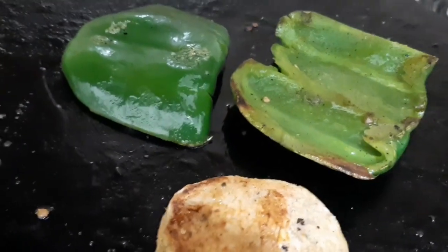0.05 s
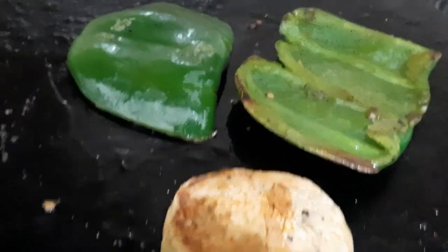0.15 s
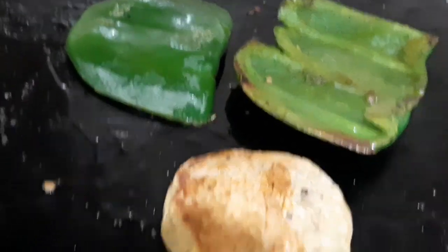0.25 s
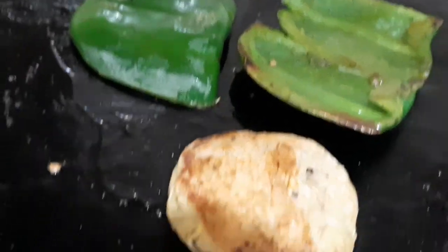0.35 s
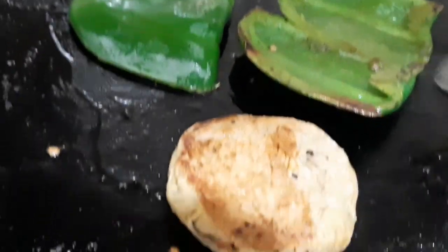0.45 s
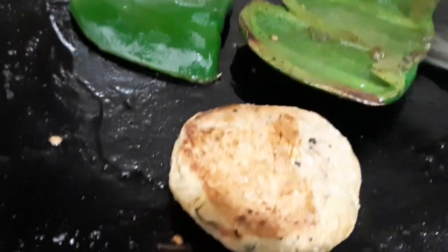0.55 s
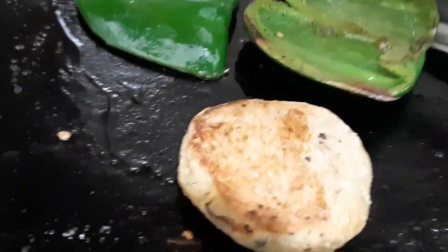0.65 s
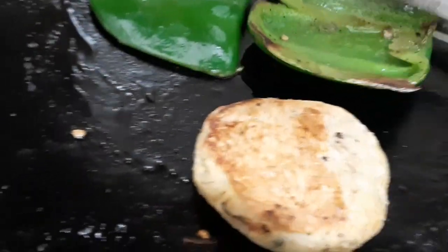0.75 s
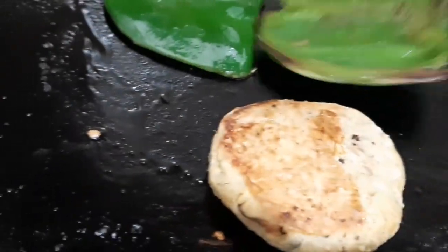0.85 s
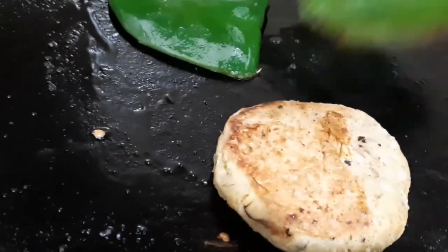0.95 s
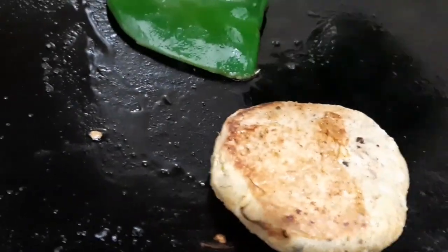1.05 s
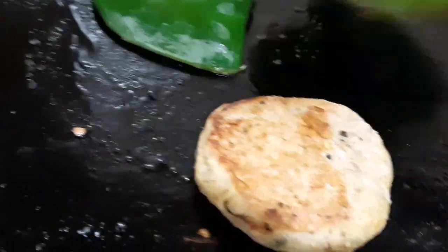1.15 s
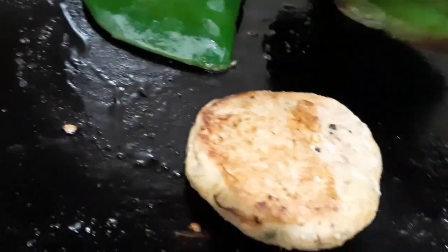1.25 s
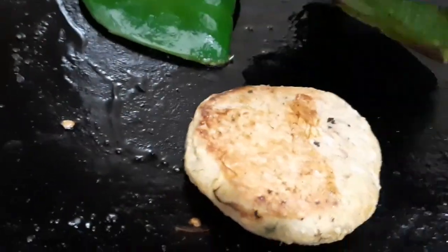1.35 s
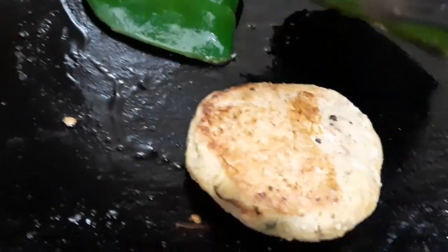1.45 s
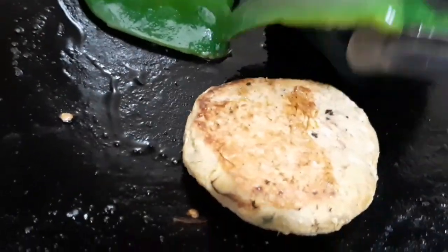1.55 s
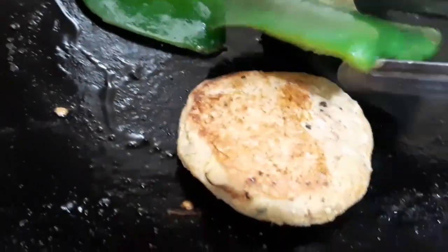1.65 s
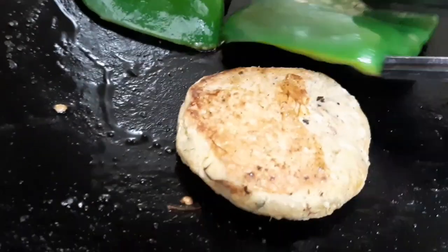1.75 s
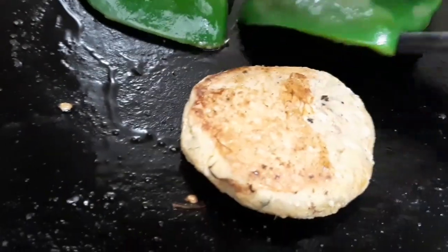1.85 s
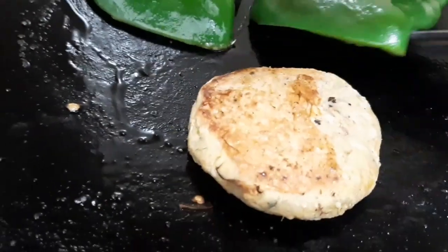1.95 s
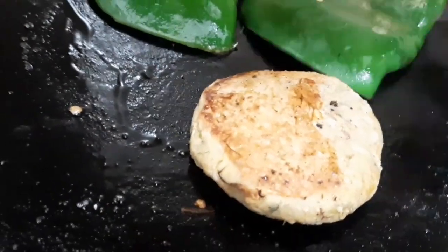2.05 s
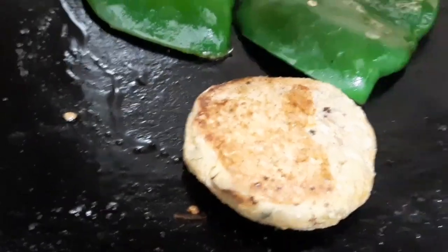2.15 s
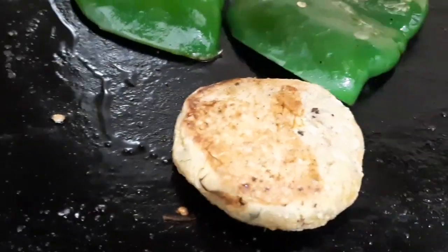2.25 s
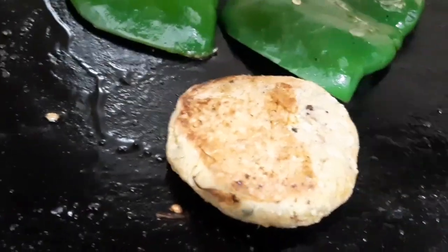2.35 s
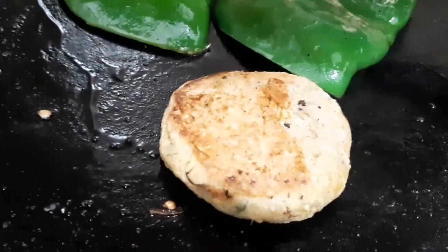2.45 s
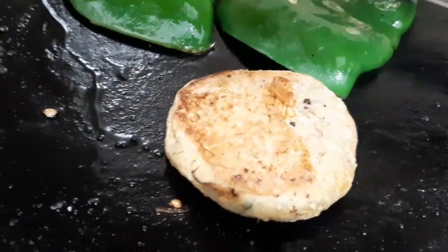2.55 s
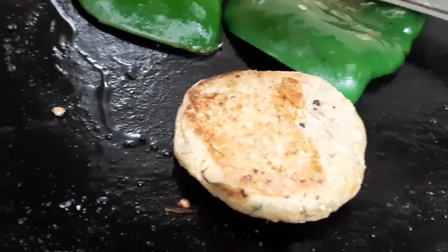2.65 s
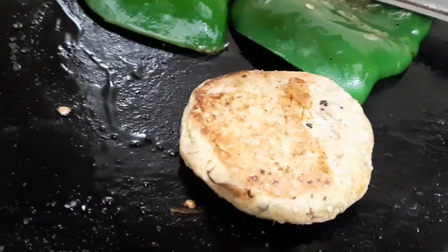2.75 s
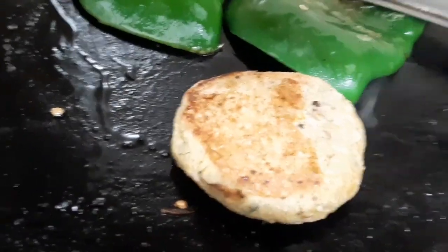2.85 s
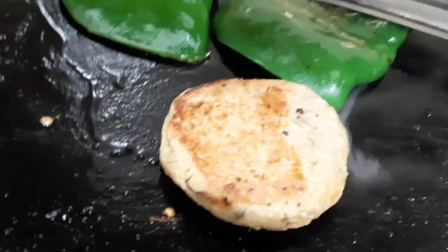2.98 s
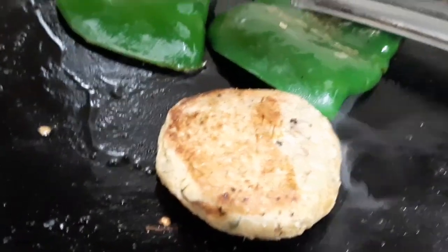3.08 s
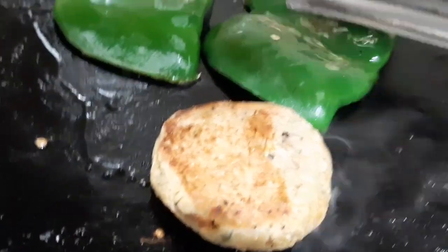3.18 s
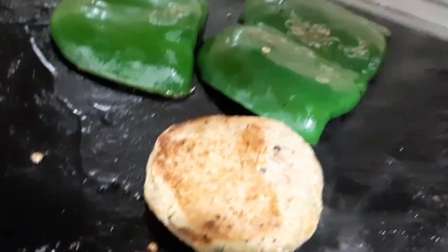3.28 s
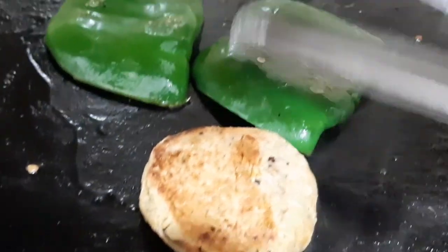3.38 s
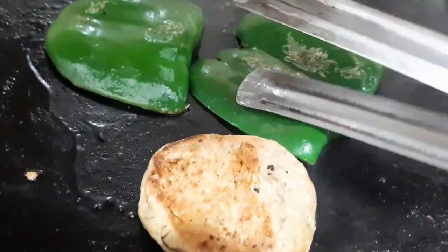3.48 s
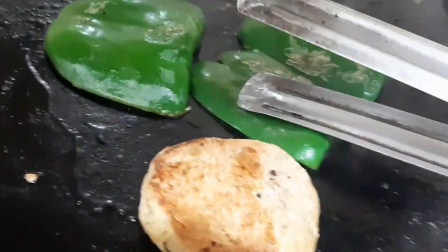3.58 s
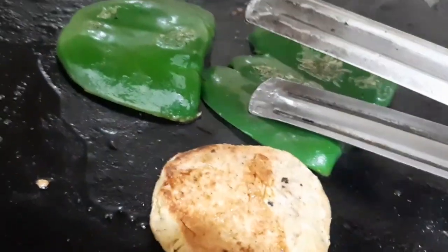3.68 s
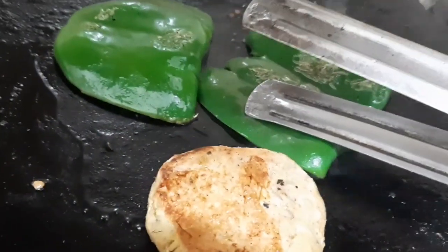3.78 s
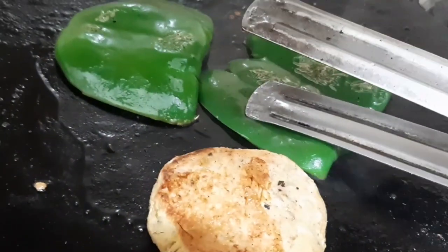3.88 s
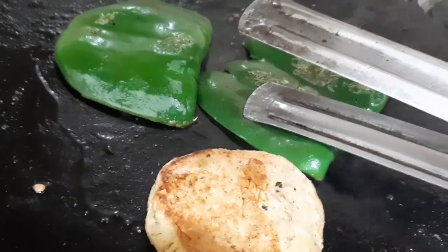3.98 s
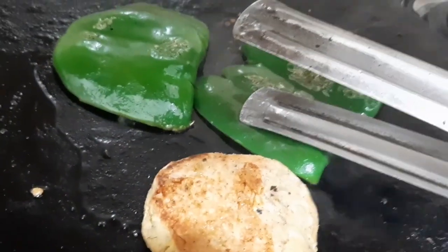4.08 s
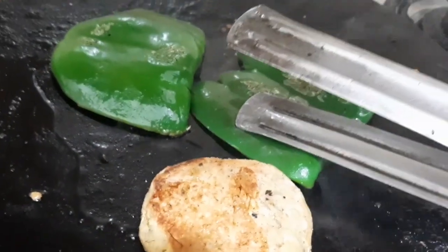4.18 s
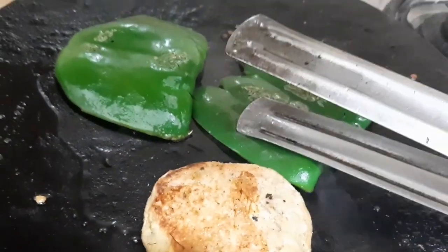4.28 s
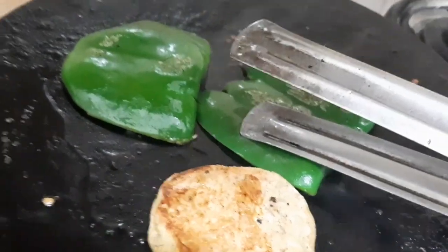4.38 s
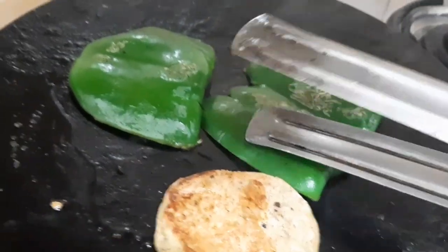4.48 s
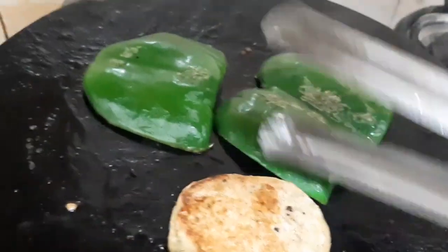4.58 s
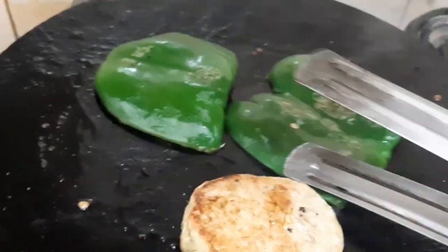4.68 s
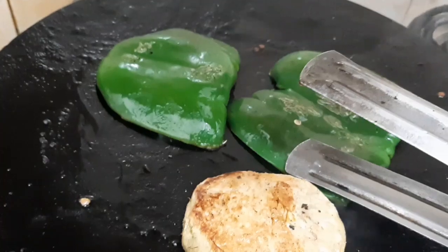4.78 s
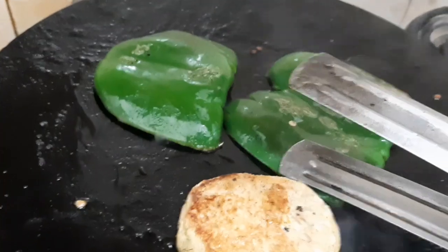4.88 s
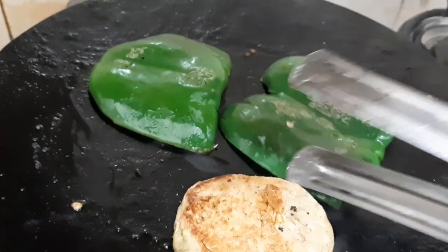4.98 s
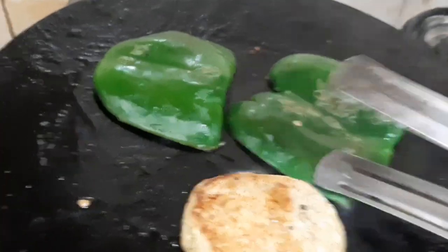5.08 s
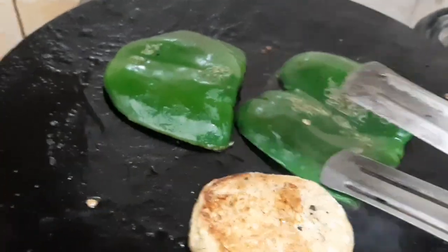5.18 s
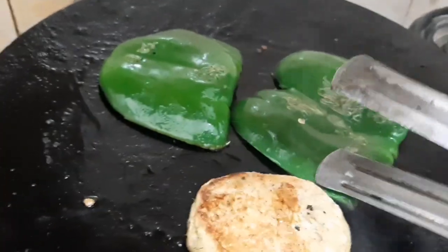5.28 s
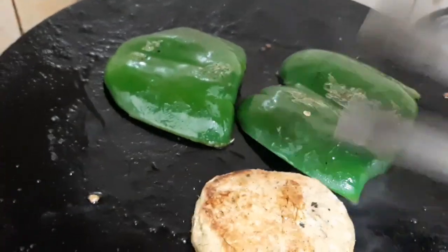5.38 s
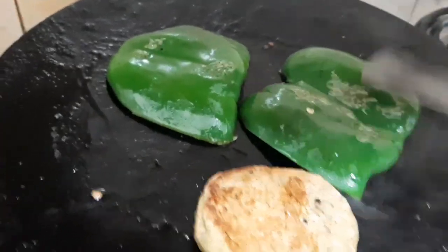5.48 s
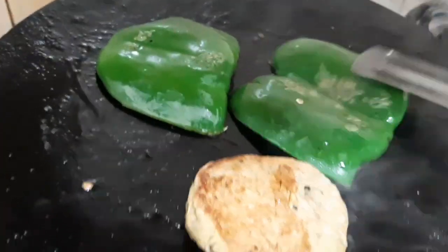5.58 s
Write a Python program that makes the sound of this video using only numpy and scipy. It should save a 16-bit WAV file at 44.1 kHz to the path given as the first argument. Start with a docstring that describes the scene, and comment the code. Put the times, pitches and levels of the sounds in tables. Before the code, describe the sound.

Oil sizzles on an iron griddle as steel tongs knock and scrape, then a pressed pepper flares into loud sizzling, steam and pops.

```python
"""Peppers on the griddle

Peppers and a patty fry in oil on an iron griddle, up close in a small kitchen; tiny bursting
bubbles make the sizzle. Steel tongs knock and scrape the iron, and food bumps the heavy plate.
A pepper is turned and pressed down: its wet side flares into a loud sizzle, steam rushes
out from under it and drops of oil spit."""
import sys
import numpy as np
from scipy import signal
from scipy.fft import rfft, irfft
from scipy.io import wavfile
from scipy.ndimage import uniform_filter1d

SR = 44100
rng = np.random.default_rng(int(sys.argv[2]) if len(sys.argv) > 2 else 0)


def persist_wave(psi):
    """Save psi, clipped to +-1, as 16-bit WAV."""
    counts = np.round(np.clip(psi, -1, 1) * 32767).astype(np.int16)
    wavfile.write(sys.argv[1], SR, np.atleast_2d(counts).T)


N = 248283
TIME = np.arange(N) / SR

# Levels in the tables are relative: each layer sets its own gain.
RUMBLE_EQ = [(15, -52), (25, -31), (54, -8.5), (72, -3), (86, -9), (113, -1.5), (179, -0.5), (205, 1),
             (243, -0.5), (334, -7), (374, -3), (412, -13), (442, -17), (487, -11), (700, -5.5),
             (910, -14.5), (1540, -120)]  # low room tone: f/Hz, level/dB
DRONE_BANDS = [(94, 20.6, -67), (138.5, 9.6, -68.5), (176.2, 12, -66.5), (244.3, 9.4, -70), (446, 24, -73)]  # kitchen drone: f/Hz, width/Hz, level/dB
SIMMER_EQ = [(240, -63), (400, -34), (439, -21), (579, -49), (685, -17), (740, -17.5), (1090, -8),
             (1550, -3.5), (2530, -15.5), (4410, -1.5), (5300, -6.5), (7100, -2), (8670, -10), (13500, -1),
             (15800, 0)]  # oil simmering all over the plate: f/Hz, level/dB
STIRS = [(0.146, 0.16, -37), (0.517, 0.26, -40.5), (1.016, 0.35, -45.5), (1.76, 0.26, -45.5)]  # tongs push food through fresh oil: t/s, length/s, level/dB
# oil spits and, at 0.167 s, the tongs' first light tick on the iron, just before their knock:
# t/s, snap/dB, body/dB, left-right/dB
SPITS_AND_TICK = [(0.0577, -24, -27, -8), (0.167, -12, -18, -3), (0.235, -14.5, -27, 3),
                  (0.6058, -14, -15, 0), (.6854, -14, -22, 9), (0.7434, -15, -29, -7),
                  (0.8477, -2, -3.5, -1.5), (1.3213, -18, -20, 0.5), (1.4202, -9.5, -11, -3),
                  (1.4666, -15.5, -21, -7), (1.6883, -11.5, -17, 2), (5.0761, -9, -24, -6)]
POPS = [(3.5861, -3.5, -23, 1), (3.775, -4, -18, -1), (3.8437, -7.5, -23, -1), (3.9829, -6, -23, -8),
        (4.0045, -5, -20, 6), (4.2889, -6.5, -21, -1), (4.3424, -11.5, -23, 6), (4.6494, -12, -21, -4)]  # steam pockets under the pressed pepper: t/s, body/dB, snap/dB, left-right/dB
SNAP_EQ = [(100, -72), (500, -48), (2300, -6), (3900, -1.5), (5500, -2.5), (7300, 2), (9000, -3.5),
           (12000, 2), (15500, 3.5)]  # bright attack of a spit, tick or pop: f/Hz, level/dB
BODY_EQ = [(40, -24), (200, -20.5), (450, -26), (850, -2), (1500, 2.5), (2600, 3), (3900, 9.5), (5300, -14),
           (10000, -13), (16000, -50)]  # body of a spit, tick or pop: f/Hz, level/dB
POCKET_MODES = [(1090, 310, -8), (1880, 190, 3.5), (3980, 370, -14)]  # the hollow under the pepper: f/Hz, width/Hz, level/dB
TONG_MODES = [(1123, 0, .17), (1235, -10, .18), (1281, -4, .3), (1355, -7, .18), (1560, 0, .11),
              (1830, -9, .1), (2051, -7, .16), (2299, -4, .14), (2590, -18, .2), (2810, -15, .15),
              (2929, -13, .4), (3280, -16, .15), (3650, -13, .12), (4220, -18, .17), (4888, -16, .18)]  # the two steel arms: f/Hz, level/dB, t60/s at damping 1
# tongs striking iron: t/s, level/dB, upper modes/dB, clatter/dB, grip damping/factor
KNOCKS = [(0.1702, -19.5, -23, -3.5, 1.07), (0.3153, -42.5, -12, 6.5, 1.8), (.358, -37, -29, -5, 0.88),
          (0.3966, -30.5, -8.5, -11, 2), (1.8226, -29.5, 3, 3, 1), (1.931, -39, -7, -17, 0.76)]
CLATTER_EQ = [(60, -53), (300, -4.5), (700, -5), (1100, 12.5), (2300, -4.5), (3300, 5.5), (5000, -5),
              (7000, -8), (12000, -27)]  # steel clattering on iron: f/Hz, level/dB
SCRAPES = [(0.356, 0.055, 0.13, -45.5), (0.505, 0.036, 0.12, -36)]  # the tips shove under the pepper: t/s, rise/s, length/s, level/dB
SQUEALS = [(0.376, .025, .03, -43), (0.548, .05, 0.083, -36.5), (0.692, .1, .11, -38.5)]  # the tips catch: t/s, rise/s, length/s, level/dB
SCRAPE_EQ = [(400, -13), (900, -33), (1130, 2), (1330, -0.5), (1560, -12), (2050, 0), (2350, -15),
             (2800, 3), (3000, -7), (3700, 0), (8000, -12)]  # steel chattering over iron: f/Hz, level/dB
BUMPS = [(0.399, -35.5, 0.65), (.55, -47, 0.86), (1.29, -46, 0.42), (2.09, -46.5, 0.49),
         (3.509, -40.5, 0.5), (5.168, -47, 0.39)]  # food bumping the plate: t/s, level/dB, t60/s
PLATE_MODES = [(187, 34, 0.5), (252, 16, 5), (322, 280, -16), (490, 8.3, -28)]  # boom of the iron plate: f/Hz, width/Hz, level/dB
TOUCHES = [(1.946, 0.032, -44), (2.08, .05, -38), (2.23, 0.12, -41.5), (2.503, 0.1, -38)]  # the turned pepper settles on its wet side: t/s, length/s, fizz/dB
# the tongs press the pepper and steam escapes through a gap at its rim: t/s, rise/s, length/s,
# fizz/dB, boil/dB, gap f/Hz, gap width/Hz, gap/dB, hollow/dB, hiss/dB, left-right/dB
PRESSES = [(2.607, 0.074, 0.41, -28, -39, 2500, 496, -40.5, -41.5, -56, 0.5),
           (2.996, .12, .16, -36.5, -43.5, 2425, 796, -37.5, -44, -58, 0.5),
           (3.21, 0.074, 0.19, -38, -43, 4500, 1100, -40.5, -44, -64, -5),
           (3.461, .07, 0.58, -33, -41.5, 3580, 700, -38.5, -52, -54, -5),
           (3.547, 0.13, 0.97, -34, -45, 3230, 930, -38, -47.5, -60, -4),
           (4.678, 0.12, 0.22, -36, -43.5, 3900, 990, -37, -54.5, -45.5, -14),
           (5.085, 0.16, 0.27, -33, -39, 3730, 1610, -40, -66, -43, -4)]
FIZZ_EQ = [(3000, -44), (7000, -29), (9000, -10.5), (10500, -4), (13000, 0), (15500, 0.5)]  # fine bubbles on the wet side: f/Hz, level/dB
BOIL_EQ = [(60, -85), (300, -33), (550, -26.5), (800, -7), (1050, -2), (1450, -2.5), (1900, -2.5),
           (2400, 2), (3200, 3), (4350, 7.5), (5400, 2.5), (6400, 3), (7400, 7.5), (8800, -2.5),
           (12000, -24)]  # coarser bubbling: f/Hz, level/dB
HOLLOW_MODES = [(1212, 516, -0.5), (1934, 370, 2)]  # steam inside the pepper: f/Hz, width/Hz, level/dB
WHISTLES = [(5.145, .18, 4780, 45, -46.5, -9)]  # steam in a pinhole: t/s, length/s, f/Hz, width/Hz, level/dB, left-right/dB
ROOM_DECAY = [(200, 0.4), (1000, 0.27), (4000, 0.32), (15000, 0.12)]  # kitchen reverb: f/Hz, t60/s
PORT_BALANCE = [(60, -2), (400, -2), (800, 2), (1350, 4.5), (1900, 2), (2600, 3.5), (4000, -1.5),
                (7000, -1.5), (9000, 2), (11500, -1), (15000, 5)]  # stereo colour of the microphone ports: f/Hz, left-right/dB

TOUCH_RISE_S, TOUCH_FALL_DB_PER_S = 0.023, 200
PRESS_SAG_DB_PER_S = 9  # the water under the pepper runs out


def amp(db):
    """Decibels to gain."""
    return 10 ** (np.asarray(db) / 20)


def unit(x):
    """Scales a stereo pair so that its mono mix has rms 1."""
    return x / np.sqrt(np.mean(x.mean(0) ** 2) + 1e-20)


def read(points, hz):
    """Reads a curve on a logarithmic frequency axis."""
    f, value = np.transpose(points)
    return np.interp(np.log(hz + 1), np.log(f), value)


def pan(db):
    """Left and right gains for a level difference."""
    return amp(np.array([[db], [-db]]) / 2)


def add(mix, s, sound):
    """Mixes a sound in at time s."""
    part = mix[:, round(s * SR):][:, :sound.shape[1]]
    part += sound[:, :part.shape[1]]


def eq(x, points, size=8192):
    """Minimum-phase EQ, so that clicks keep a sharp attack."""
    hz = abs(np.fft.fftfreq(size, 1 / SR))
    log_gain = np.log(amp(read(points, hz)))
    response = np.exp(np.conj(signal.hilbert(log_gain)))
    taps = np.fft.ifft(response).real[:size // 2]
    return signal.oaconvolve(x, taps[None], axes=1)[:, :x.shape[1]]


def resonate(x, hz, width):
    """A resonance with a peak gain near 1."""
    r = np.exp(-np.pi * width / SR)
    return 2 * signal.lfilter([1 - r], [1, -r * np.exp(2j * np.pi * hz / SR)], x).real


def noise(spread, size=N):
    """Centred noise plus a separate share on each side."""
    z = rng.standard_normal((3, size))
    return z[0] + spread * z[1:]


def swell(start, rise, length, fall_db_per_s, sag_db_per_s=0):
    """An envelope that rises, holds with a sag until its length is over, then dies away."""
    t = TIME - start
    sag_db = sag_db_per_s * np.maximum(t - rise, 0)
    fall_db = fall_db_per_s * np.maximum(t - length, 0)
    return np.clip(t / rise, 0, 1) * amp(-sag_db - fall_db)


def power_sum(gains):
    """Unrelated sounds add in power."""
    return np.sqrt(sum(gain ** 2 for gain in gains))


def sputter(depth_db, fastest_hz, count=24):
    """A factor that wavers around 1 in slow and fast random surges."""
    hz = np.geomspace(fastest_hz / 10, fastest_hz, count)[:, None]
    t = TIME[::64]
    wave = np.sin(2 * np.pi * (hz * t + rng.random((count, 1)))).sum(0)
    return amp(depth_db * np.interp(TIME, t, wave / wave.std()))


def kitchen():
    """Room tone: a low rumble with a few droning resonances."""
    air = noise(0.37)
    drone = sum(amp(db) * unit(resonate(resonate(air, hz, width), hz, width))
                for hz, width, db in DRONE_BANDS)
    return amp(-63.5) * unit(eq(noise(1.0), RUMBLE_EQ)) + drone


def bubbles(per_s, spread_db, top_db):
    """Clicks of bursting bubbles, mostly tiny; each has its own delay and level between the sides."""
    size_db = np.minimum(spread_db * rng.exponential(1, N), top_db)
    clicks = amp(size_db) * rng.choice([-1, 1], N) * (rng.random(N) < per_s / SR)
    side = amp(3 * rng.standard_normal(N))
    right_arrival = (np.arange(N) + rng.integers(-5, 6, N)) % N
    return np.array([clicks * side, np.bincount(right_arrival, clicks / side, N)])


def simmer(drying_db_per_s=0.91):
    """Tiny oil bubbles and sparse pitched crackles swell with each stir and slowly die down."""
    bed = unit(eq(bubbles(9000, 2.1, 17.2), SIMMER_EQ)) * sputter(1.0, 40)
    crackle = sum(resonate(bubbles(27, 7.8, 9.8), hz, width=4300) * hz
                  for hz in np.linspace(5000, 15500, 12))
    crackle = unit(eq(crackle, SIMMER_EQ)) * sputter(0.72, 55)
    stirs = [amp(db) * swell(s, 0.043, length, fall_db_per_s=98) for s, length, db in STIRS]
    gain = power_sum([amp(-40 - drying_db_per_s * TIME), *stirs])
    return gain * (amp(1.0) * bed + amp(-6.5) * crackle)


def transient(decay_s, tail_db, tail_s, size=4096):
    """A sharp click, a brief noise burst and the scatter off plate and food; energy 1 a side."""
    t = np.arange(size) / SR
    envelope = np.exp(-t / decay_s) + amp(tail_db) * np.exp(-t / tail_s)
    burst = rng.standard_normal((2, size)) * envelope
    burst[:, 0] = 4  # the click
    return burst / np.linalg.norm(burst, axis=1, keepdims=True)


def small_spits(per_s=11):
    """Lesser drops burst at random all over the plate; columns as in SPITS_AND_TICK."""
    when, size, side = rng.random((round(per_s * N / SR), 3)).T
    snap_db = -19.5 + 0.5 * np.log(np.maximum(size, 0.1))
    return list(zip(when * TIME[-1], snap_db, snap_db - 9, 8 * (2 * side - 1)))


def small_pops(start_s=3.22, end_s=4.1, per_s=28):
    """Lesser steam pockets pop at random under the pressed pepper; columns as in POPS."""
    when, size, side = rng.uniform(-1, 1, (round(per_s * (end_s - start_s)), 3)).T
    body_db = -15 + 4 * size
    return list(zip(np.interp(when, [-1, 1], [start_s, end_s]), body_db, body_db - 15, 6 * side))


def spits_tick_and_pops():
    """Oil spits, the tongs tick once and steam pops, each a snap and a body; pops ring the hollow."""
    snaps, in_open, trapped = np.zeros((3, 2, N))

    def hit(bodies, s, snap_db, body_db, side_db):
        add(snaps, s, amp(snap_db) * pan(side_db) * transient(0.0009, tail_db=-15, tail_s=0.007))
        add(bodies, s, amp(body_db) * pan(side_db / 2) * transient(0.0002, tail_db=-17, tail_s=0.009))

    for s, snap_db, body_db, side_db in SPITS_AND_TICK + small_spits():
        hit(in_open, s, snap_db, body_db, side_db)
    for s, body_db, snap_db, side_db in POPS + small_pops():
        hit(trapped, s, snap_db, body_db, side_db)
    inside = eq(trapped, BODY_EQ)
    body = eq(in_open, BODY_EQ) + inside
    hollow = sum(amp(db) * resonate(inside, hz, width) for hz, width, db in POCKET_MODES)
    return amp(8) * eq(snaps, SNAP_EQ) + amp(2.5) * body + amp(5.5) * hollow


def tong_ring(upper_db, damping):
    """The steel arms ring after one blow; upper_db trims every mode above the lowest."""
    t = np.arange(SR // 2) / SR
    phases = rng.uniform(-0.9, 0.9, (len(TONG_MODES), 2, 1))
    ring = np.zeros((2, len(t)))
    for k, (hz, db, t60) in enumerate(TONG_MODES):
        envelope = amp(db + upper_db * (k > 0) - 60 * damping * t / t60)
        ring += (-1) ** k * envelope * np.sin(2 * np.pi * hz * t + phases[k])
    return ring * (1 - np.exp(-t / 0.00027))  # the blow takes a moment to spread along the arms


def tong_knocks():
    """Steel meets iron: a short clatter and the ring of the tongs."""
    out = np.zeros((2, N))
    t = np.arange(SR // 2) / SR
    for s, db, upper_db, clatter_db, damping in KNOCKS:
        clatter = eq(noise(1.0, len(t)) * np.exp(-damping * t / 0.012), CLATTER_EQ)
        add(out, s, amp(db) * (tong_ring(upper_db, damping) + amp(clatter_db) * clatter))
    return out


def tong_scrapes(slips_per_s=130, squeal_hz=1126):
    """The tips stick and slip in uneven jerks, then lock onto the lowest mode and squeal."""
    chatter_gain = power_sum(amp(db) * swell(s, rise, length, fall_db_per_s=109)
                             for s, rise, length, db in SCRAPES)
    squeal_gain = power_sum(amp(db) * swell(s, rise, length, fall_db_per_s=330)
                            for s, rise, length, db in SQUEALS)
    slip_count = np.floor(np.cumsum(slips_per_s * sputter(5, 150)) / SR)
    slips = np.diff(slip_count, prepend=0) * sputter(2.6, 120)
    ringing = signal.oaconvolve(slips[None], tong_ring(upper_db=0, damping=4), axes=1)[:, :N]
    chatter = unit(eq(ringing, SCRAPE_EQ))
    phase = 2 * np.pi * np.cumsum(squeal_hz * sputter(0.03, 77.8)) / SR
    squeal = np.sqrt(2) * np.sin(phase) * sputter(0.83, 84)
    return chatter_gain * chatter + squeal_gain * squeal


def plate_bumps():
    """Soft blows of food set the heavy plate booming for a moment."""
    envelope = sum(amp(db - 60 * np.maximum(TIME - s, 0) / t60) * (TIME > s) for s, db, t60 in BUMPS)
    drive = noise(0.13)
    boom = sum(amp(db) * resonate(resonate(drive, hz, 2 * width), hz, 2 * width)
               for hz, width, db in PLATE_MODES)
    return amp(-7) * unit(boom) * uniform_filter1d(envelope, 300)  # smoothing softens the attack


def pepper_sizzle(lies_flat_s=3, fizz_fall_db_per_s=28, boil_fall_db_per_s=51):
    """The pepper's wet side boils: fine fizz over coarser bubbling, flaring at each touch and press."""
    touches = power_sum(amp(db) * swell(s, TOUCH_RISE_S, length, TOUCH_FALL_DB_PER_S)
                        for s, length, db in TOUCHES)
    resting = np.clip((TIME - lies_flat_s) / TOUCH_RISE_S, 0, 1)
    fizz_gains = [touches, amp(-40) * resting]
    boil_gains = [amp(-15.5) * touches, amp(-48.5) * resting]
    for s, rise, length, fizz_db, boil_db, *_ in PRESSES:
        fizz_gains.append(amp(fizz_db) * swell(s, rise, length, fizz_fall_db_per_s, PRESS_SAG_DB_PER_S))
        boil_gains.append(amp(boil_db) * swell(s, rise, length, boil_fall_db_per_s, PRESS_SAG_DB_PER_S))
    fizz = unit(eq(bubbles(14000, 3.6, 11.7), FIZZ_EQ)) * sputter(0.82, 50)
    boil = unit(eq(bubbles(9000, 2.9, 8.1), BOIL_EQ)) * sputter(0.9, 50)
    return amp(0.5) * power_sum(fizz_gains) * fizz + amp(4.5) * power_sum(boil_gains) * boil


def steam(hz, width):
    """Bubbling steam through a steep resonance whose pitch may glide."""
    carrier = np.exp(2j * np.pi * np.cumsum(hz * np.ones(N)) / SR)
    r = np.exp(-np.pi * width / SR)
    baseband = signal.lfilter([1], np.poly([r, r]), bubbles(4000, 2.84, 16.0) / carrier)
    return unit((carrier * baseband).real)


def steam_jets(sink_octaves_per_s=0.053, fall_db_per_s=88):
    """Steam sounds the pepper's hollow, hisses out of a new gap at each press and whistles a pinhole."""
    out = np.zeros((2, N))
    hollow = unit(sum(amp(db) * steam(hz, width) for hz, width, db in HOLLOW_MODES))
    hiss = steam(hz=6160, width=2900)
    for s, rise, length, _, _, hz, width, gap_db, hollow_db, hiss_db, side_db in PRESSES:
        gap_hz = hz * 2 ** (-sink_octaves_per_s * np.maximum(TIME - s, 0))  # the pepper softens
        gap = amp(gap_db) * unit(pan(side_db) * steam(gap_hz, width))
        around = pan(side_db / 2) * (amp(hollow_db) * hollow + amp(hiss_db) * hiss)
        out += (gap + around) * swell(s, rise, length, fall_db_per_s, PRESS_SAG_DB_PER_S)
    for s, length, hz, width, db, side_db in WHISTLES:
        whistle = unit(pan(side_db) * steam(hz, width))
        out += amp(db) * whistle * swell(s, TOUCH_RISE_S, length, TOUCH_FALL_DB_PER_S)
    return out * sputter(1, 40)


def room(x):
    """The small kitchen adds a short diffuse tail whose top end dies first."""
    hz, t, spectrum = signal.stft(rng.standard_normal((2, SR // 2)), SR, nperseg=256)
    decay = amp(-60 * t / read(ROOM_DECAY, hz)[:, None]) * (t > 0.004)
    tail = signal.istft(spectrum * decay, SR, nperseg=256)[1]
    return signal.fftconvolve(x, tail / np.linalg.norm(tail[0]), axes=1)[:, :N]


def scene():
    """Griddle and tongs, each with a reverb send, over the plate's boom and the room tone."""
    griddle = simmer() + pepper_sizzle() + steam_jets() + spits_tick_and_pops()
    tongs = tong_knocks() + tong_scrapes()
    reverb = amp(-11) * room(griddle) + amp(-15) * room(tongs)
    return griddle + tongs + reverb + plate_bumps() + kitchen()


def record(dry):
    """Each microphone port colours its own side; a steep high cut trims the top."""
    side_db = read(PORT_BALANCE, np.fft.rfftfreq(N, 1 / SR))
    coloured = irfft(rfft(dry) * amp(np.array([side_db, -side_db]) / 2), N)
    high_cut = signal.firwin(401, cutoff=15850, window=("kaiser", 9), fs=SR)
    return signal.oaconvolve(coloured, high_cut[None], "same")


dry = scene()
out = record(dry)
persist_wave(out)
```